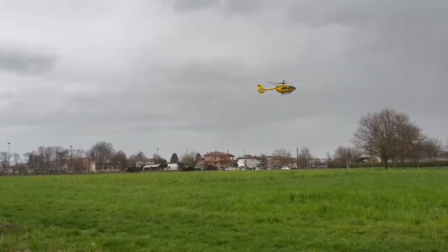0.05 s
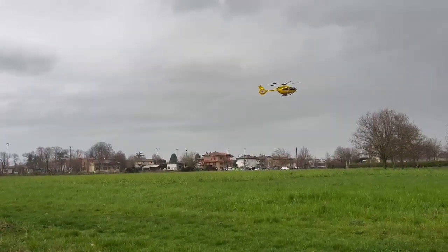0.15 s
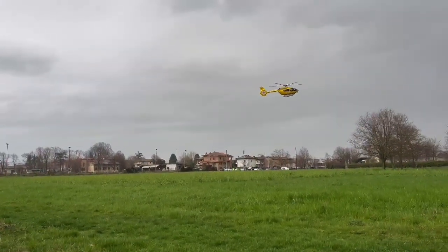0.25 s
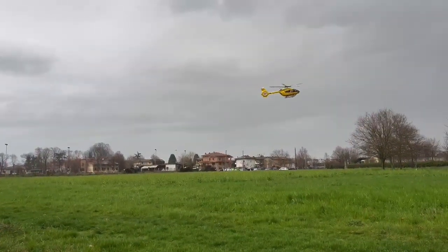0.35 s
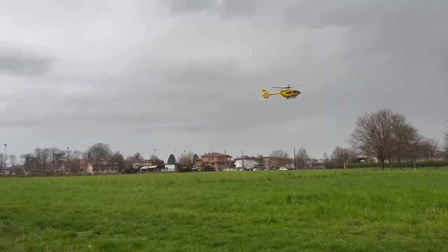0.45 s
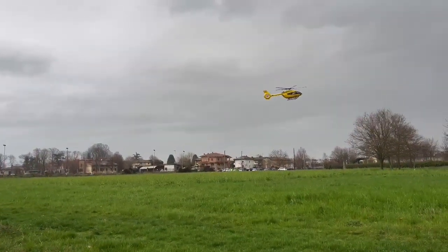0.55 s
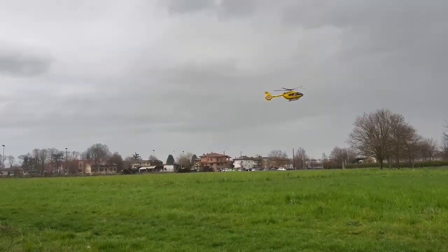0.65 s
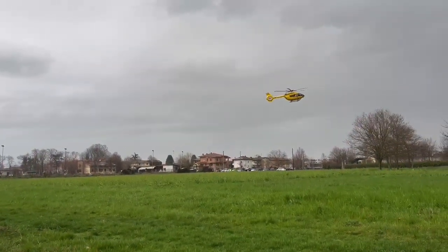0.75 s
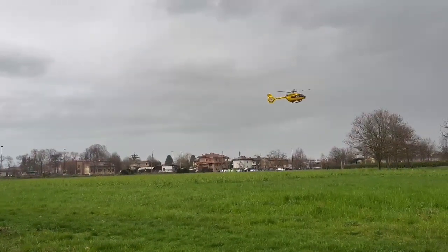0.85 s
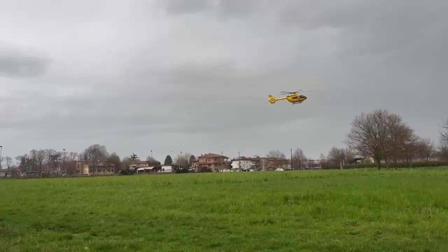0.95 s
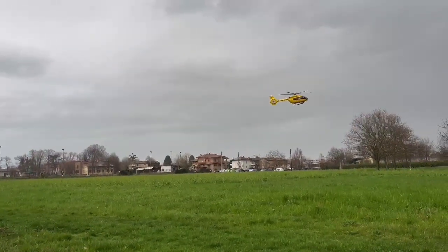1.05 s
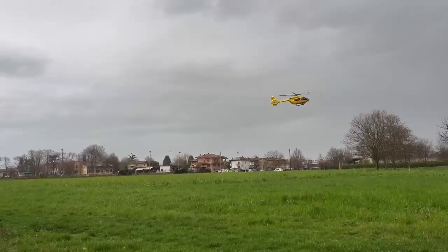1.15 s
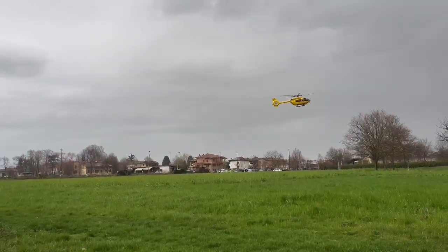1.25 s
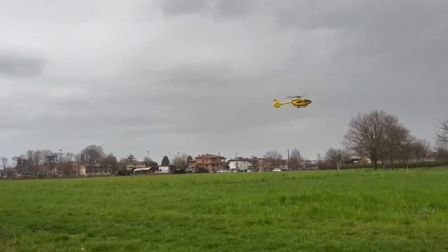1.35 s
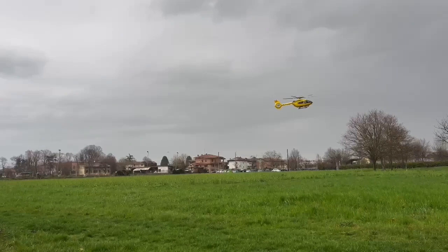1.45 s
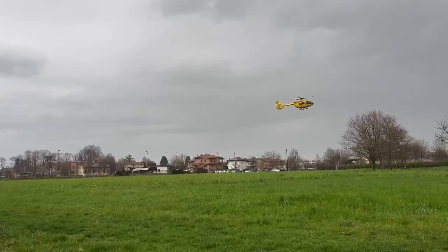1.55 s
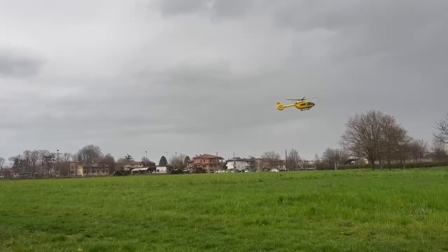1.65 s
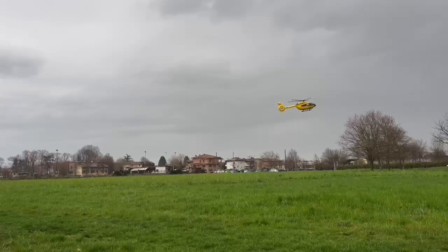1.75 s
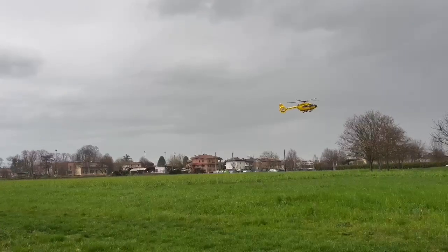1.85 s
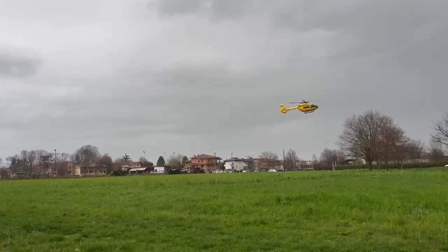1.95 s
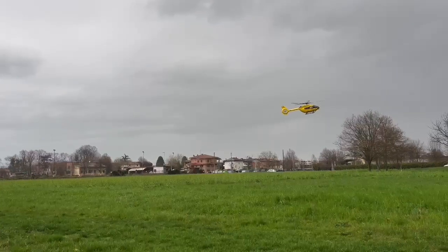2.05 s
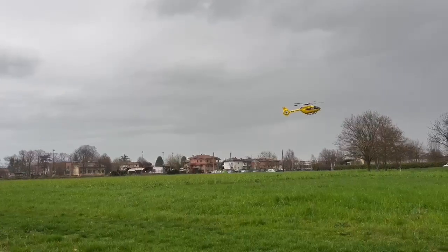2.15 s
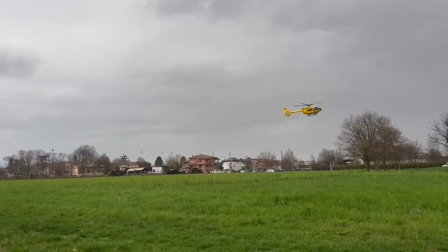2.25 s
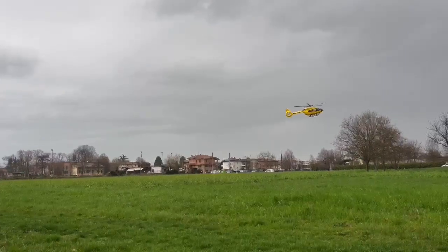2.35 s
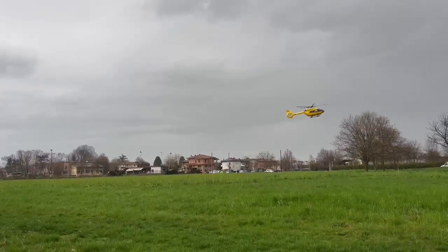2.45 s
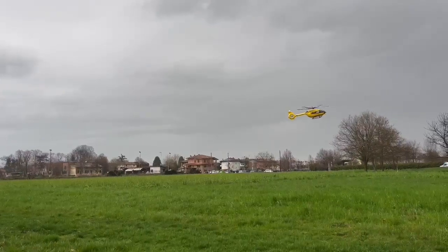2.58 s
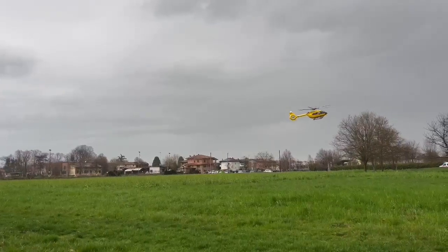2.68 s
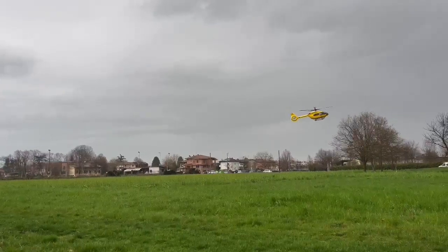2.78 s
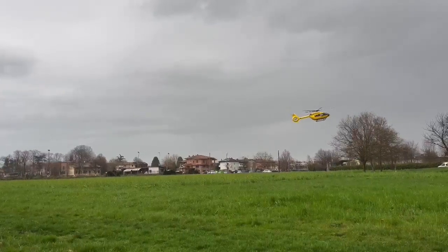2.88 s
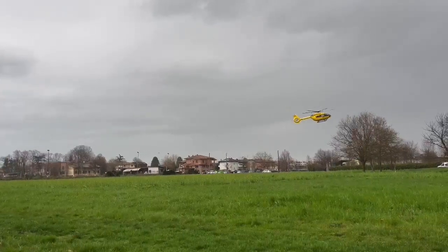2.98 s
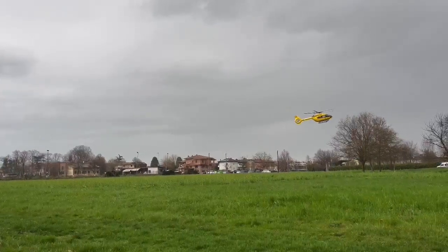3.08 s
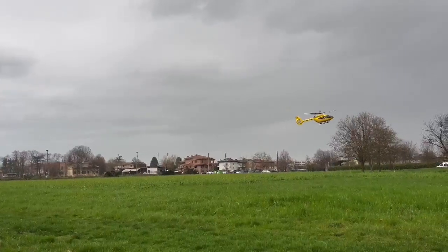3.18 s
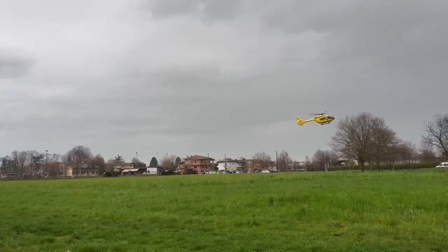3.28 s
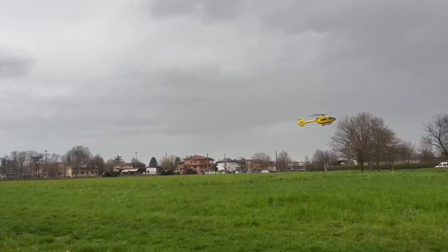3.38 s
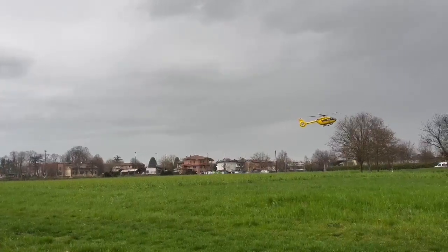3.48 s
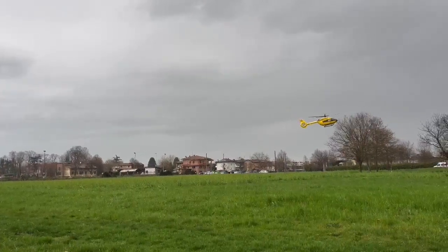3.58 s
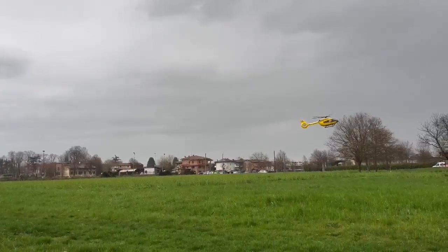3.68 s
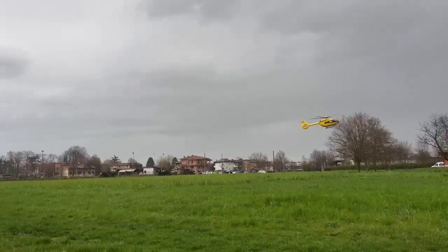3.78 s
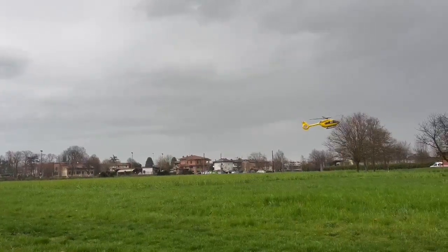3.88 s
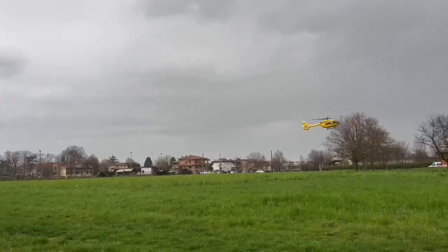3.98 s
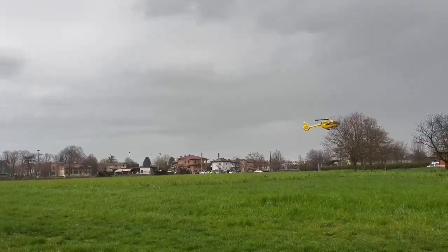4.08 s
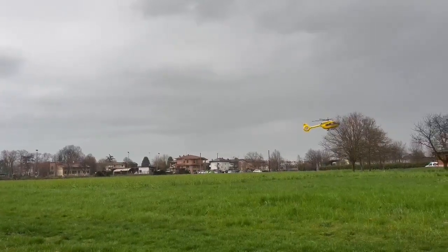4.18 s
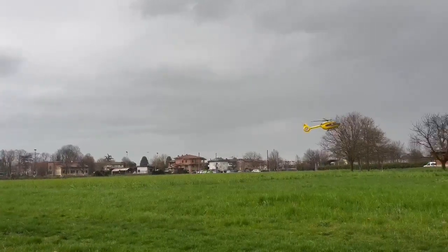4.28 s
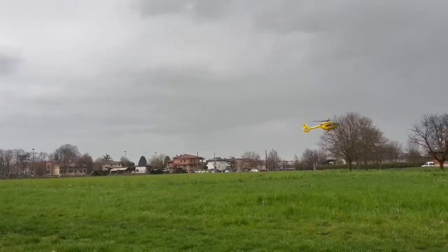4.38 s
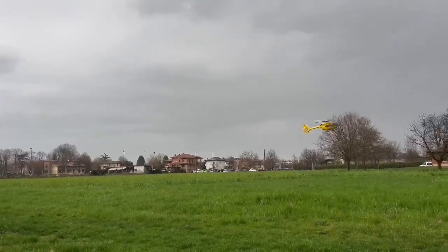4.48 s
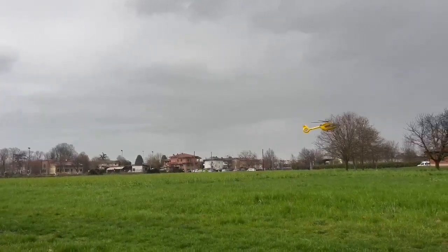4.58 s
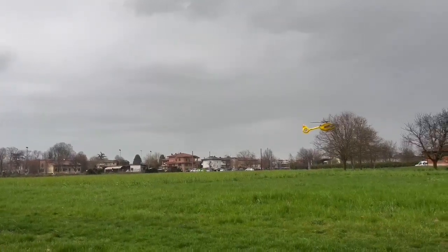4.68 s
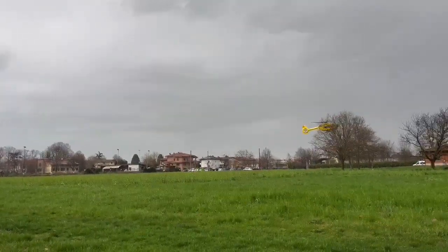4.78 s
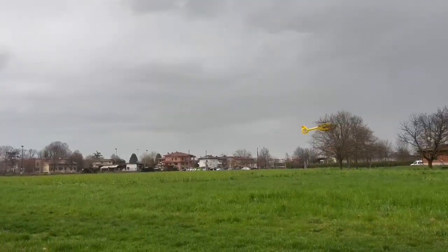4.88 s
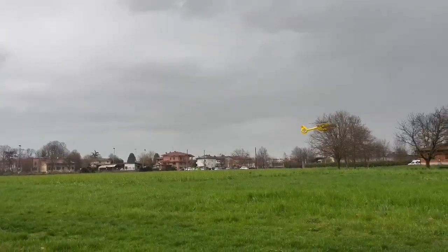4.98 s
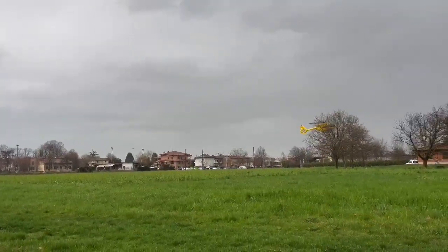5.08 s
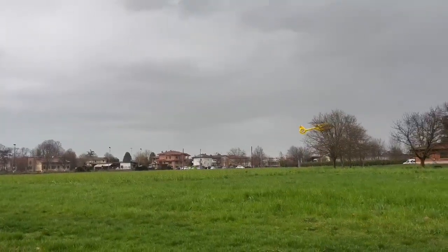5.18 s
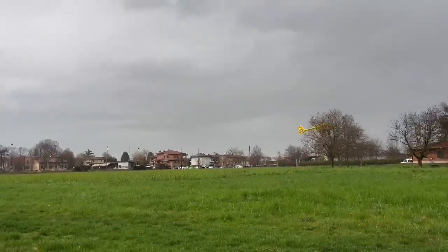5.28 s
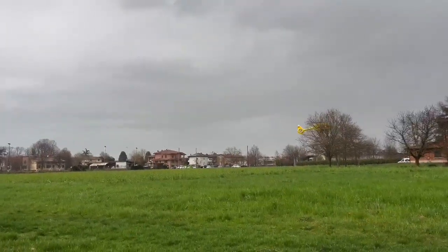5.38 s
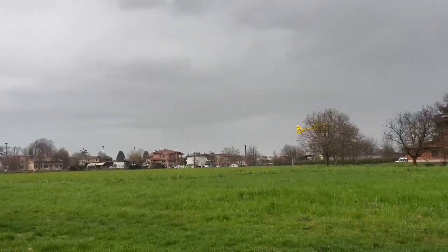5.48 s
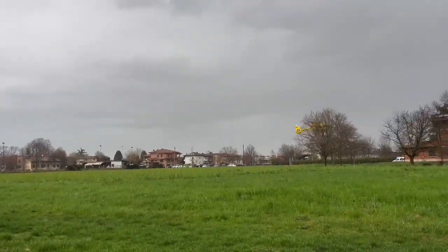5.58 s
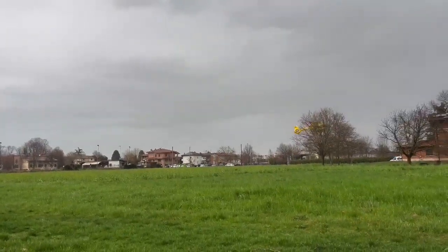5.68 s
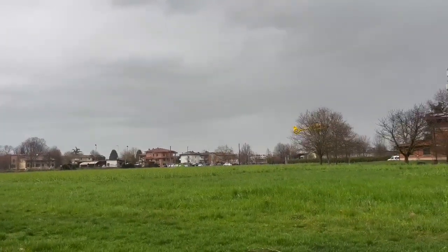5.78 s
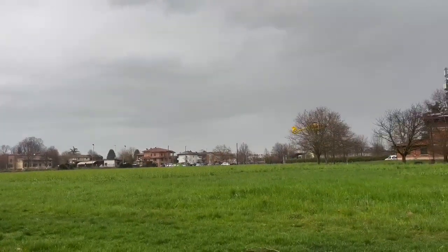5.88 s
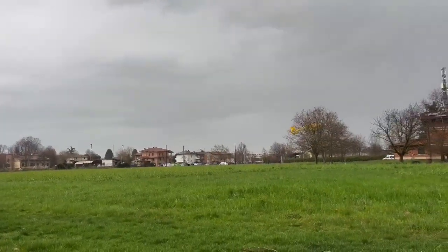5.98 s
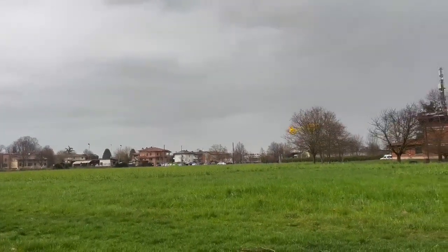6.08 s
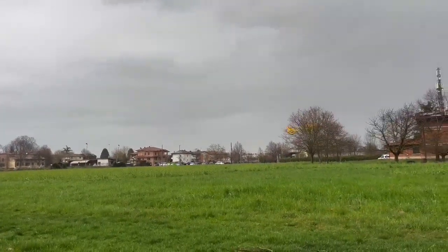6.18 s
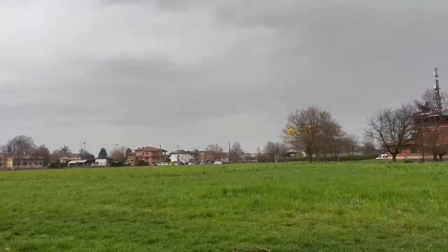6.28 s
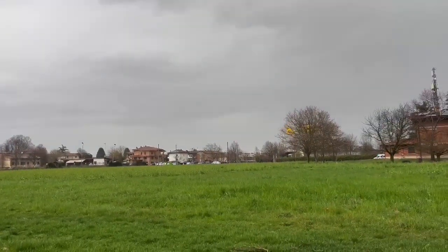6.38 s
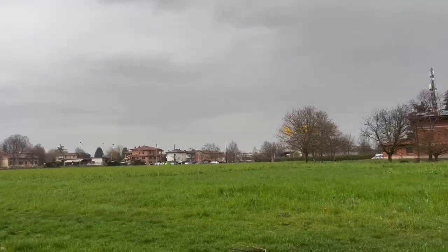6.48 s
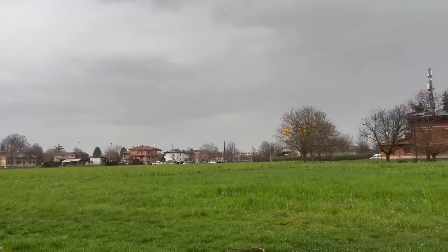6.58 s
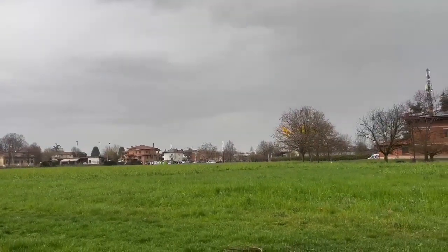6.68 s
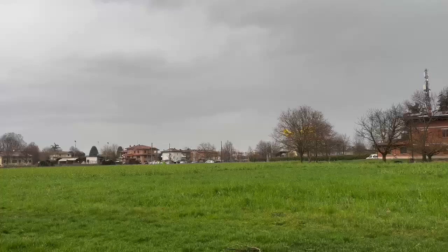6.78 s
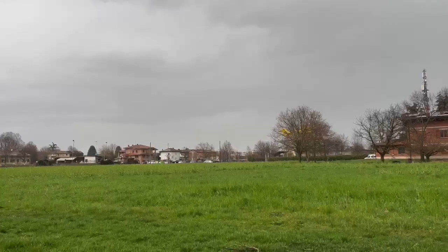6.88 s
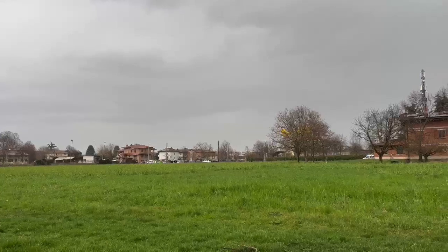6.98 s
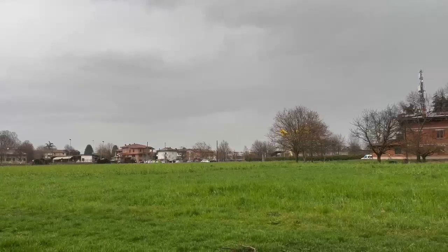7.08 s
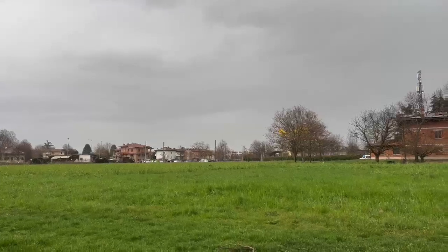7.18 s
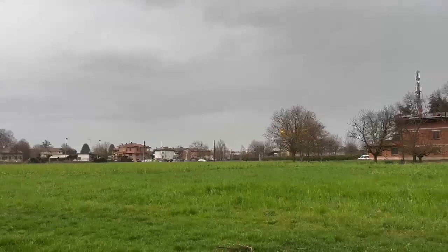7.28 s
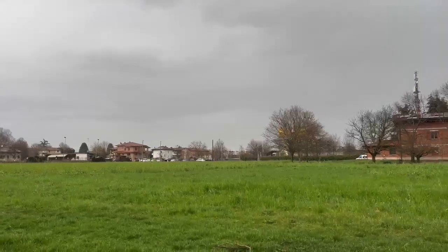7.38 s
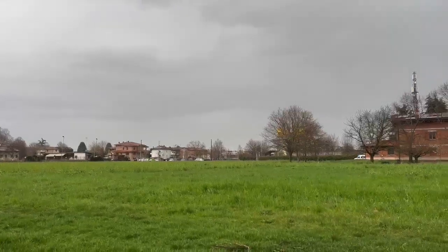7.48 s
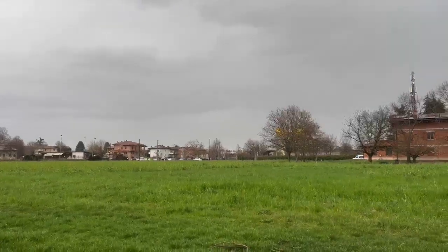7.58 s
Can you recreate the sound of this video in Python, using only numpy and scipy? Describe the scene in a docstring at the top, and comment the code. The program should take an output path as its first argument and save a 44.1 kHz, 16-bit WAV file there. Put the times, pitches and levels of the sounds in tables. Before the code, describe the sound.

A light helicopter is already airborne low over an open meadow, heard by a phone with wind on its two microphones. A rapid, deep rotor throb, about 32 beats a second, gently chops a broad, breathy roar for the whole 7.6 seconds. At about 0.4 s a soft engine whistle near 3.4 kHz appears, fading by 2.4 s; a thin, shimmering turbine whine around 8 to 10 kHz stays faintly above. Light clatter starts near 1 s, sharper slaps from 2.6 s, and the hardest crackling run at 3.6-4.5 s, with roar peaking near 4.1 s. Another bout comes at 5-5.7 s. Low wind rumble and short thuddy flaps are busiest from 1 to 4.7 s. After 6 s the throb drops back and treble dulls as the helicopter goes behind trees; a raspy, uneven roar continues to the end, with only weak wind.

```python
"""A light helicopter flies low over a meadow and away behind trees, heard through a phone's two microphone ports.
Its rotor thump is a sum of cosines on the blade rate, about 32 passes a second, which also chops the roar.
Roar, turbine whine and whistle are noise shaped over time and pitch; bouts of sharp slaps are short bursts of noise.
Drifting air makes the sound swell and fade. Wind rumbles as coloured noise, and gusts buffet the ports as
short low flaps that sink in pitch."""
import sys
import numpy as np
from scipy import signal
from scipy.fft import rfft, irfft, next_fast_len
from scipy.io import wavfile
from scipy.ndimage import uniform_filter1d

SR = 44100
rng = np.random.default_rng(int(sys.argv[2]) if len(sys.argv) > 2 else 0)


def bounce(signal):
    """Save signal as a 16-bit WAV file at the path given by the first command-line argument."""
    frames = np.transpose(np.atleast_2d(signal))
    limited = np.clip(frames, -1, 1)
    pcm = np.round(limited * 32767).astype(np.int16)
    wavfile.write(sys.argv[1], SR, pcm)


N = 336924
TIME = np.arange(N) / SR
# short-time grid for shaped noise: one row per frame, one column per frequency bin
FRAME_S = np.arange(N // 256 + 5)[:, None] * 256 / SR
BIN_HZ = np.fft.rfftfreq(1024, 1 / SR)


def gain_of(db):
    """Decibels to amplitude."""
    return 10 ** (np.asarray(db) / 20)


def evened(x):
    """Scales to unit rms."""
    return x / np.sqrt(np.mean(x ** 2) + 1e-20)


def curve(rows, t=TIME, axis=1):
    """One column of a time table, interpolated at the times t."""
    rows = np.array(rows, float)
    return np.interp(t, rows[:, 0], rows[:, axis])


def read(points, hz=BIN_HZ):
    """A spectrum table, interpolated on a log-frequency axis."""
    f, value = np.transpose(points)
    return np.interp(np.log(hz + 1), np.log(f + 1), value)


def hump(centre_hz, octaves):
    """A bell of height 1 over log frequency."""
    distance = np.log2((BIN_HZ + 1) / centre_hz) / octaves
    return np.exp(-.5 * distance ** 2)


def drift(hz, shape=(), size=8192):
    """Slow chance of unit rms, up to about hz; one curve for each place in shape."""
    f = np.fft.rfftfreq(size, N / SR / size)
    spectrum = rfft(rng.standard_normal((*shape, size))) * np.exp(-(f / hz) ** 2)
    slow = evened(irfft(spectrum))
    at = np.linspace(0, N / SR, size)
    curves = [np.interp(TIME, at, row) for row in slow.reshape(-1, size)]
    return np.reshape(curves, (*shape, N))


def add(mix, s, sound):
    """Mixes a sound in at time s, cut off at the end of the mix."""
    part = mix[..., max(round(s * SR), 0):][..., :sound.shape[-1]]
    part += sound[..., :part.shape[-1]]


def patches(size=3, count=24):
    """Eddies along the path focus and scatter patches of the spectrum, size bins wide, for count frames."""
    chance = rng.standard_normal((len(FRAME_S), len(BIN_HZ)))
    lasting = uniform_filter1d(chance, size=count, axis=0)
    return evened(uniform_filter1d(lasting, size=size, axis=1))


# phase between the two ports: pitch_hz, left_lead_rad
PORT_LEAD = [(100, 0), (600, 0), (800, 1), (1250, 1.1), (1400, 1.9), (1550, 4.3), (1750, 5.8), (2000, 8.1),
             (2400, 11.6), (2800, 15.1), (3150, 18.6), (3450, 19.3), (3800, 24.6), (4150, 25.3), (4700, 25),
             (5100, 23), (5500, 24.9), (6300, 24.8), (7000, 22.5), (8400, 21.8), (9000, 20.1), (9700, 21.3),
             (10500, 19.3)]
# how alike the ports hear each pitch: pitch_hz, likeness_0_to_1
PORT_MATCH = [(60, .88), (150, .55), (300, .25), (550, .65), (800, .9), (1020, .94), (1420, .4), (1900, .8),
              (2850, .82), (3450, .55), (4000, .8), (4400, .6), (4850, .65), (5600, .5), (7300, .6),
              (8300, .75), (9500, .5)]
# level between the ports: pitch_hz, left_minus_right_db
PORT_TILT = [(100, -12), (330, 1.5), (520, -0.5), (690, -10), (850, 0), (1150, -1), (1430, 7), (1750, -5),
             (3000, -2.5), (4200, -1.5), (8300, -1), (9700, -3)]
# bearing from the phone, which slides the ports' pattern down in pitch: time_s, frequency_factor
BEARING_SLIDE = [(0, 1.06), (.9, 1.03), (2.1, 1), (3.3, .97), (4.9, .915), (5.35, .86), (5.85, .76),
                 (7.64, .735)]


def port_noise(field_db):
    """Noise of the given short-time spectrum at two ports, whose pattern slides with the bearing."""
    a, b, c, d = rng.standard_normal((4, len(FRAME_S), len(BIN_HZ)))
    slide_share = read([(900, 0), (1700, 1), (5500, 1), (7500, 0)])
    hz = BIN_HZ / curve(BEARING_SLIDE, FRAME_S) ** slide_share
    same = np.clip(read(PORT_MATCH, hz), 0, 1)
    side_gain = gain_of(read(PORT_TILT, hz) / 2)
    left = a + 1j * b
    mixed = same * left + np.sqrt(1 - same ** 2) * (c + 1j * d)
    right = mixed * np.exp(-1j * read(PORT_LEAD, hz))
    z = np.array([left * side_gain, right / side_gain]) * gain_of(field_db)
    return signal.istft(z, nperseg=1024, noverlap=768, time_axis=1, freq_axis=2)[1][:, :N]


# pace of the rotor: time_s, blade_rate_hz
BLADE_PACE = [(0, 32.27), (3.2, 32.33), (5, 32.42), (6.8, 32.48), (7.64, 32.65)]


def blade_passes():
    """Running count of blade passes, whole and part, as the rotor turns."""
    return np.cumsum(curve(BLADE_PACE)) / SR


# swell of the thump, before its harmonics are summed: time_s, relative_level_db
THUMP_SWELL = [(0, -42), (.4, -28), (.85, -22), (1.2, -23), (1.42, -33.5), (1.75, -28.5), (2.2, -25),
               (2.45, -27.5), (3.0, -22.5), (3.3, -29.5), (3.6, -20.5), (3.92, -32), (4.1, -24.5),
               (4.4, -23.5), (4.53, -37), (4.7, -24.5), (5.1, -23), (5.65, -23.5), (5.95, -38.5),
               (6.4, -33), (6.6, -44), (7.64, -42)]
# harmonics of the thump: blade_rate_multiple, relative_level_db
THUMP_HARMONICS = [(1, -12.5), (2, 0), (3, -5), (4, -5.5), (5, -14), (6, -17), (7, -16), (8, -23)]
# edge of the pulses, as the rotor's angle changes: time_s, harmonics_from_third_up_db
PULSE_EDGE = [(0, -8), (.7, -4.5), (1.5, -5.5), (2.2, -1.5), (3.0, -9.5), (3.6, -16), (4.2, -4.5),
              (5.2, -9.5), (6.3, -5), (7.64, -6)]


def thump(passes, waver_db=0.65):
    """Each blade pushes one pressure pulse: a firm hum whose upper harmonics the air unsettles most."""
    out = np.zeros((2, N))
    stir = .012 * drift(6, (2,))  # turns, separate at each port
    for k, (_, db) in enumerate(THUMP_HARMONICS, 1):
        wander, waver = drift(2), drift(5)
        turns = k * (passes - .88 + .007 * wander) + stir
        edge_db = (k > 2) * curve(PULSE_EDGE)
        size = gain_of(db + edge_db + waver_db * k / 2 * waver)
        out += size * np.cos(2 * np.pi * turns)
    port_gain = gain_of([[-.5], [.5]])
    return np.sqrt(2) * out * gain_of(curve(THUMP_SWELL)) * port_gain


# bouts in which the blades cut their own wake and clatter: start_s, length_s, chop_0_to_1
CLATTER_BOUTS = [(1.06, 1.3, .15), (2.42, 1.0, .33), (3.54, .98, .38), (4.9, .82, .3)]


def clatter(edge_s=0.17):
    """How hard the blades cut the wake, 0-1: each bout builds up, holds and dies away."""
    total = 0
    for s, length, chop in CLATTER_BOUTS:
        inside_s = np.minimum(TIME - s, s + length - TIME)
        total = total + chop * np.clip(inside_s / edge_s, 0, 1)
    return total


def chopping(passes, treble_share=0.4, calm_chop=0.094, far_chop=0.079):
    """Gains below and above the split: the roar swells as each blade comes round, then dies back."""
    onset_turns, peak_turns = .49, .25  # in blade passes
    depth, uneven_db = 2.9, .8
    since = passes - onset_turns + 1
    age = since % 1 / peak_turns
    surge = (age * np.exp(1 - age)) ** 4
    strength = gain_of(uneven_db * rng.standard_normal(1000))[since.astype(int)]
    chop = np.maximum(clatter(), np.linspace(calm_chop, far_chop, N))
    beat = depth * chop * strength * surge
    gains = 1 + beat, 1 + treble_share * beat
    # divide out the slower loudness, so that the beat alone remains
    return [g / np.sqrt(uniform_filter1d(g ** 2, size=8192)) for g in gains]


# narrow bands that stand out of the roar or sink into it, fading outside start and end:
# start_s, end_s, first_hz, last_hz, width_hz, boost_db
GLIDING_BANDS = [(0.5, 7.64, 443, 372, 29, 3.5), (-2.5, 5.5, 1030, 910, 63, 4.5),
                 (1.5, 1.1, 1990, 1970, 59, 11), (1.5, 5.6, 2210, 1840, 186, 5),
                 (4.5, 3.9, 2900, 2980, 49, 9), (1.5, 1.5, 3840, 2400, 65, -5),
                 (-1, 2.6, 4200, 4030, 160, 5), (5.5, 9.4, 2420, 2800, 160, 4.5),
                 (5, 10, 3860, 3960, 160, 5.5), (1.5, 2.5, 6450, 6730, 250, 7.5),
                 (0.1, 1.6, 3200, 3200, 490, 5), (1, 1.1, 950, 960, 55, 1.5)]


def bands(fade_s=1.0):
    """Boost in dB of the narrow bands, which come, glide and go as the helicopter turns."""
    field = 0
    for start, end, start_hz, end_hz, width, db in GLIDING_BANDS:
        hz = np.interp(FRAME_S, [start, end], [start_hz, end_hz])
        inside_s = np.minimum(FRAME_S - start, end - FRAME_S)
        present = np.clip(inside_s / fade_s + 1, 0, 1)
        field = field + db * present * np.exp(-.5 * ((BIN_HZ - hz) / width) ** 2)
    return field


# roar of rotor and exhaust, before overall trims:
# time_s, relative_level_db, middle_relative_db, treble_relative_db
ROAR_SWELL = [(0, -29, 3.5, -2), (.2, -28.5, 2.5, -8.5), (.36, -26, 2, -5), (.65, -26, 0.5, -8),
              (1.23, -27, -0.5, -5.5), (1.36, -26, -1, -7), (2.1, -31, 3.5, -6), (2.68, -31, -1.5, -6.5),
              (3.07, -29, 6.5, -2), (3.25, -27.5, -1.5, -8), (3.5, -29, -1, -7), (3.85, -27.5, 2.5, -5),
              (4.1, -22.5, -3.5, -9.5), (4.22, -24.5, -4, -9.5), (4.35, -24.5, 2, -3.5),
              (4.56, -28, -0.5, -4), (4.72, -26, 0, -5), (4.92, -30.5, 2, -4.5), (5.3, -27.5, 1, -10.5),
              (5.7, -26.5, 0, -7), (6.03, -25.5, -0.5, -8), (6.2, -26.5, -0.5, -8.5), (6.57, -30, 2, -6),
              (6.75, -28.5, 1.5, -4), (6.92, -27, 0, -6), (7.1, -29, 1, -12), (7.3, -28, .5, -7.5),
              (7.64, -30, 1, -11.5)]
# colour of the roar: pitch_hz, relative_level_db_per_hz
ROAR_TONE = [(60, -15), (200, -9), (420, -3.5), (520, -4), (680, 0), (1000, -0.5), (1150, -4), (1600, -7),
             (1950, -6), (2800, -11.5), (3600, -14.5), (4700, -16.5), (5300, -25.5), (7700, -33),
             (11500, -50.5)]
# cancellation by the reflection off the grass, mostly rising as the path flattens:
# time_s, centre_hz, relative_depth_db
GRASS_DIP = [(0, 266, 34), (.7, 274, 7), (2.2, 377, 0), (3.5, 346, 1), (5.3, 430, 5), (6.4, 437, 4),
             (7.64, 378, 6.5)]
# exhaust rasp, heard as the tail turns this way, before its spectral weights: time_s, relative_boost_db
EXHAUST_RASP = [(0, 0), (5.3, -2), (5.9, 5.5), (6.4, 4), (7.64, 7.5)]
# treble lost to the air, before a share for each pitch (negative brightens): time_s, relative_loss_db
AIR_LOSS = [(0, -10), (2, 0.5), (3.6, -5), (4.4, 0.5), (5.0, -0.5), (6.3, 9.5), (7.64, 3)]


def roar(passes, level_db=3.0, middle_db=0.5, treble_db=0., split_hz=2700, shimmer_db=1.6):
    """Turbulence off the blades and exhaust, coloured by the ground and by drifting air."""
    level = curve(ROAR_SWELL, FRAME_S)
    middle = curve(ROAR_SWELL, FRAME_S, axis=2)
    treble = curve(ROAR_SWELL, FRAME_S, axis=3)
    field = read(ROAR_TONE) + level + bands()
    field += read([(1050, 0), (1300, 1), (2300, 1), (2800, 0)]) * (middle + middle_db)
    field += read([(2300, 0), (2800, 1)]) * (treble - treble.mean() + treble_db)
    field -= read([(4200, 0.073), (6000, 0.44)]) * curve(AIR_LOSS, FRAME_S)

    # the ground reflection cancels one band and lifts the one above it
    dip_hz, dip_db = curve(GRASS_DIP, FRAME_S), curve(GRASS_DIP, FRAME_S, axis=2)
    field -= (hump(dip_hz, 0.49) - .5 * hump(1.64 * dip_hz, 0.4)) * dip_db
    rasp = 1.0 * hump(1276, 0.32) - 0.45 * hump(2280, 0.04) - 2.94 * hump(1016, 0.054)
    field += rasp * curve(EXHAUST_RASP, FRAME_S)

    # drifting air, in fine, broad and brief patches
    field += read([(400, 1.5), (1500, 1.5), (3000, 2.2), (6000, 3)]) * patches()
    field += read([(500, 0.11), (2000, 0.39)]) * shimmer_db * patches(size=12)
    field += read([(300, .5), (1000, 1.3), (2000, 1.9), (5000, 1.5)]) * patches(size=9, count=7)

    sound = evened(port_noise(field))
    low = signal.sosfiltfilt(signal.butter(2, split_hz, fs=SR, output="sos"), sound)
    low_gain, high_gain = chopping(passes)
    chopped = low * low_gain + (sound - low) * high_gain
    mean_gain = np.sqrt(np.mean(gain_of(level) ** 2))
    flutter_db = .7 * drift(30)
    return chopped * mean_gain * gain_of(level_db + flutter_db)


# swell of the turbine whine, before its trim: time_s, relative_level_db
WHINE_SWELL = [(0, -41.5), (.7, -39.5), (2.2, -39.5), (3.4, -39.5), (3.8, -33), (4.5, -42.5), (5.7, -36.5),
               (6.2, -45), (7.64, -49.5)]
# tones of the whine, before their glide: pitch_hz, width_hz, relative_level_db
COMPRESSOR_TONES = [(8400, 150, 6), (9150, 800, -8), (9850, 400, -3.5)]
# glide of these tones: time_s, frequency_factor
TONE_GLIDE = [(0, .978), (1.2, .986), (3, .998), (5.5, 1.004), (7.64, 1.004)]
# a lower whistle of the engine, early in the pass: time_s, level_db
WHISTLE_SWELL = [(.25, -61), (.36, -27), (.45, -36), (1.2, -42.5), (2.4, -61)]


def narrow_band(hz, width):
    """A resonance-like peak of height 1 with steep sides."""
    return 1 / (1 + ((BIN_HZ - hz) / width) ** 2) ** 2


def turbines(whine_db=-12.5, whistle_hz=3380, whistle_width_hz=200, flutter_db=5.0, dulling=0.82):
    """Compressor tones, smeared by the air into narrow bands that shimmer."""
    glide = curve(TONE_GLIDE, FRAME_S)
    tones = sum(gain_of(db) * narrow_band(hz * glide, width) for hz, width, db in COMPRESSOR_TONES)
    # the air takes most from the upper tones
    loss_db = dulling * read([(8500, 0.14), (10000, 0.7)]) * curve(AIR_LOSS, FRAME_S)
    whine_field = 20 * np.log10(tones) + 3 * np.tanh(patches()) - loss_db
    whine = evened(port_noise(whine_field))
    whistle = evened(port_noise(20 * np.log10(narrow_band(whistle_hz, whistle_width_hz))))
    whine_level_db = curve(WHINE_SWELL) + whine_db + flutter_db * np.tanh(drift(22))
    return whine * gain_of(whine_level_db) + whistle * gain_of(curve(WHISTLE_SWELL))


# wind on the microphone, before lumps and port balance: time_s, relative_level_db
WIND_SWELL = [(0, -34.5), (.4, -29.5), (.75, -25), (1.08, -23), (1.3, -27.5), (1.5, -31), (1.75, -28.5),
              (2.05, -23.5), (2.2, -28.5), (2.45, -29.5), (2.9, -23), (3.1, -27.5), (3.35, -23.5),
              (3.58, -26.5), (3.8, -25.5), (4.0, -25), (4.3, -23.5), (4.47, -26.5), (4.65, -21.5),
              (4.9, -28.5), (5.2, -29), (5.35, -26), (5.5, -29), (5.68, -24.5), (5.9, -32), (6.25, -29.5),
              (6.6, -37), (7.0, -34), (7.64, -36.5)]
# rumble of the breeze: pitch_hz, relative_level_db_per_hz
WIND_TONE = [(12, -14), (38, -2), (54, 5.5), (80, 6), (120, -0.5), (190, -1.5), (260, -11.5), (400, -18),
             (900, -71), (4000, -102)]


def wind(level_db=0., apart=1.6):
    """Lumpy rumble of the gusts; part of it is eddies that reach one port only."""
    size = next_fast_len(N)
    colour = gain_of(read(WIND_TONE, np.fft.rfftfreq(size, 1 / SR)))
    eddies = irfft(rfft(rng.standard_normal((3, size))) * colour, size)[:, :N]
    rumble = evened(eddies[0] + apart * eddies[1:])  # one shared eddy, one for each port
    lumps_db = 2.5 * np.tanh(drift(18))
    port_gain = gain_of([[-.6], [.6]])
    return rumble * gain_of(curve(WIND_SWELL) + level_db + lumps_db) * port_gain


# single buffets, before their trim: start_s, relative_peak_db, starting_pitch_hz, rise_s
GUST_FLAPS = [(1.018, -17, 148, 0.0035), (1.247, -13, 203, 0.0025), (1.321, -15.5, 216, 0.0029),
              (1.897, -10, 158, 0.0045), (1.973, -15, 345, 0.0057), (1.979, -5.5, 114, 0.0039),
              (2.031, -15.5, 140, 0.0032), (2.153, -12, 92, 0.01), (2.182, -18, 105, .004),
              (2.701, -16.5, 196, 0.003), (2.871, -14, 202, 0.0037), (3.332, -14, 173, 0.0053),
              (3.796, -8.5, 161, 0.0028), (4.037, -12, 187, 0.0028), (4.53, -10, 232, .005),
              (4.537, -12.5, 120, 0.0088), (4.646, -22, 170, 0.0052), (4.678, -10, 190, 0.0034),
              (4.71, -18, 230, 0.0027), (5.332, -15.5, 169, 0.0062), (6.163, -20, 142, 0.0034),
              (6.974, -16.5, 202, 0.0034)]


def buffets(level_db=-2.5, sag=0.18):
    """An eddy strikes the ports: a short low flap that sinks in pitch."""
    out, t = np.zeros((2, N)), np.arange(SR // 10) / SR
    for s, db, hz, rise_s in GUST_FLAPS:
        start_turns = rng.random() + 0.12 * rng.standard_normal((2, 1))  # slightly apart at the ports
        turns = hz * t * (1 - sag * t / t[-1]) + start_turns
        swell = (t / rise_s) * np.exp(1 - t / rise_s)
        add(out, s, gain_of(db + level_db) * swell * np.sin(2 * np.pi * turns))
    return out


# the hardest blade slaps, before the filter and trim: time_s, relative_level_db
HARD_SLAPS = [(2.62, -19), (2.649, -17), (2.744, -17), (2.775, -17), (2.898, -16), (3.022, -15),
              (3.053, -11), (3.084, -12), (3.206, -14), (3.238, -16), (3.333, -16), (3.643, -14),
              (3.675, -13), (3.704, -16), (3.73, -16), (3.762, -17), (3.827, -11), (3.854, -12),
              (3.886, -11), (3.954, -9), (3.979, -11), (4.008, -13), (4.072, -8), (4.104, -13), (4.13, -11),
              (4.226, -14), (4.26, -10), (4.288, -9), (4.351, -12), (4.383, -11), (4.443, -14),
              (4.999, -15), (5.031, -15), (5.061, -12), (5.096, -14), (5.154, -14), (5.184, -11),
              (5.213, -16), (5.276, -12), (5.311, -14), (5.403, -15), (5.494, -14), (5.585, -15),
              (5.643, -13)]


def slaps(passes, level_db=-16.0, low_hz=550, high_hz=1900, top_hz=4000):
    """A blade hits the vortex of the one before: trains of cracks a few milliseconds long, some harder."""
    lesser_db, spread_db = -9.5, 1.0  # lesser slaps: relative level at a chop of 1, scatter
    place_turns, lead_s = .63, .0015  # place in a blade pass; build-up before the slap's time
    out, t = np.zeros((2, N)), np.arange(SR // 40) / SR
    crack = np.exp(-t / .0026) * (1 - np.exp(-t / .003)) ** 2
    colour = [(150, -25), (low_hz, -1.5), (950, 0), (high_hz, -7), (4500, -24), (9000, -48)]
    noise = port_noise(read(colour))

    blades = np.flatnonzero(np.diff(np.floor(passes - place_turns)))
    sizes = clatter()[blades] * gain_of(lesser_db + spread_db * rng.standard_normal(len(blades)))
    hits = [(s, gain_of(db)) for s, db in HARD_SLAPS]
    for s, size in zip(blades / SR, sizes):
        # no lesser slap on top of a hard one
        if size > 0 and min(abs(s - hard_s) for hard_s, _ in HARD_SLAPS) > .015:
            hits.append((s, size))

    for s, size in hits:
        burst = noise[:, round(s * SR):][:, :len(t)] * crack
        add(out, s - lead_s, size * evened(burst))
    lowpass = signal.butter(4, top_hz, fs=SR, output="sos")
    return signal.sosfilt(lowpass, out) * gain_of(level_db)


def scene():
    """The turning rotor drives thump, chop and slaps; the wind is at the microphone."""
    passes = blade_passes()
    return thump(passes) + roar(passes) + turbines() + wind() + buffets() + slaps(passes)


def record(dry, edge_hz=11500):
    """The recorder's band limit: a steep low-pass."""
    lowpass = signal.firwin(511, edge_hz, window=("kaiser", 9), fs=SR)
    return signal.oaconvolve(dry, lowpass[None], "same")


dry = scene()
out = record(dry)
bounce(out)
```